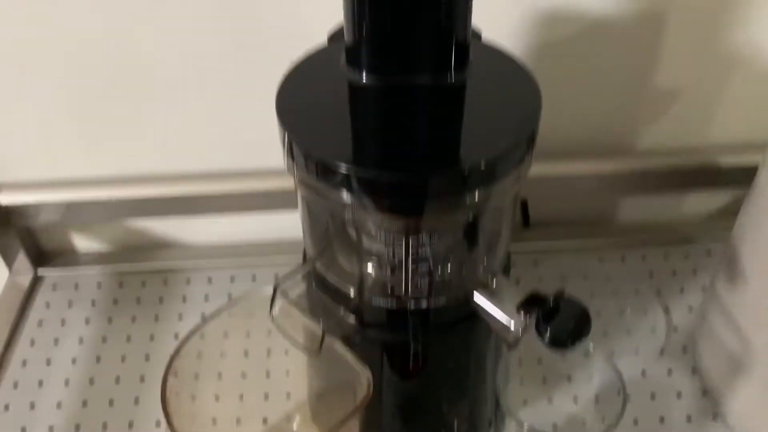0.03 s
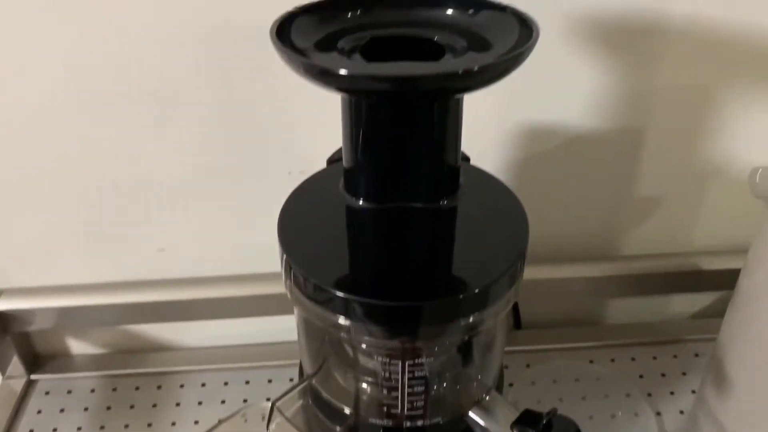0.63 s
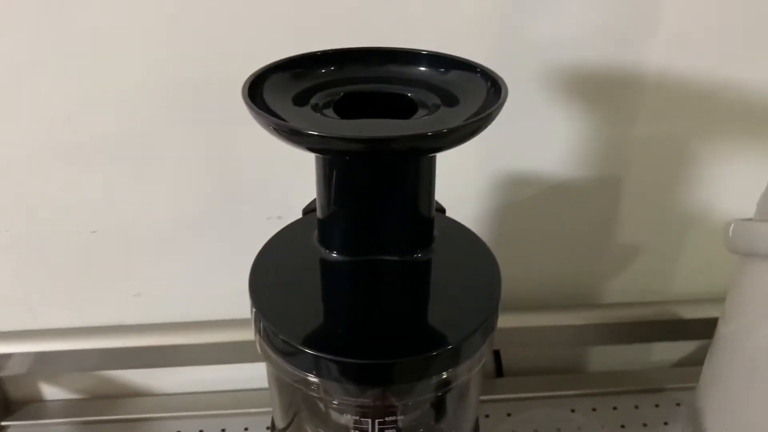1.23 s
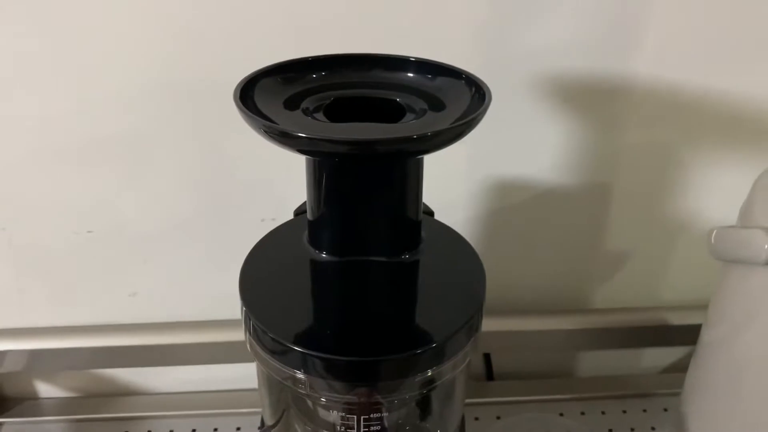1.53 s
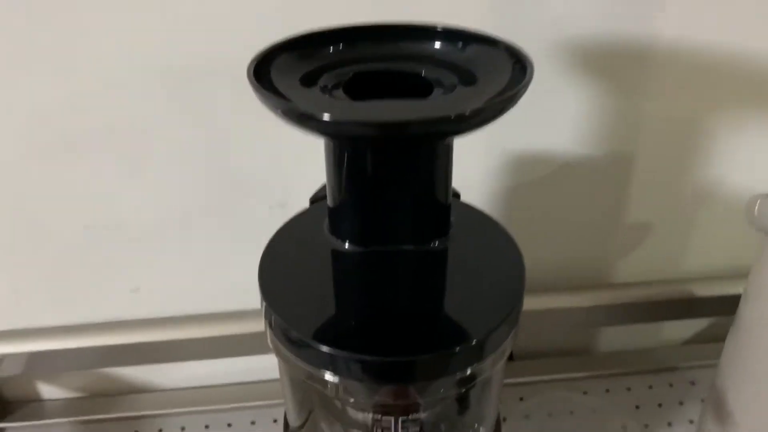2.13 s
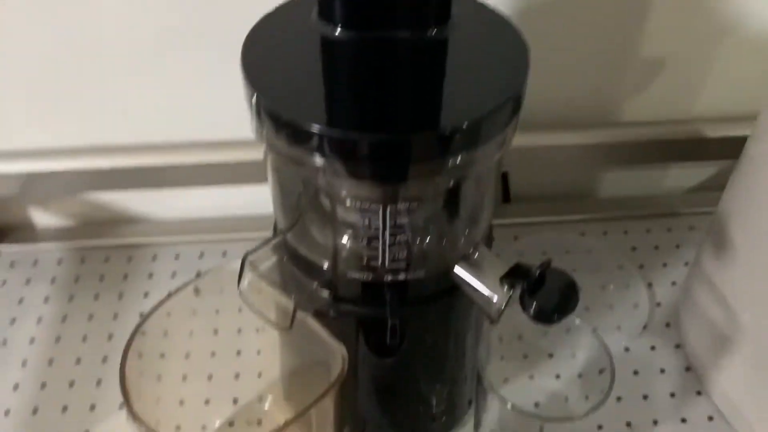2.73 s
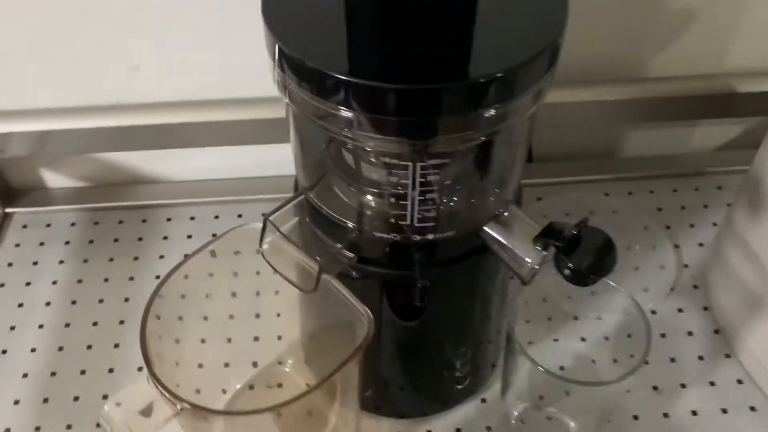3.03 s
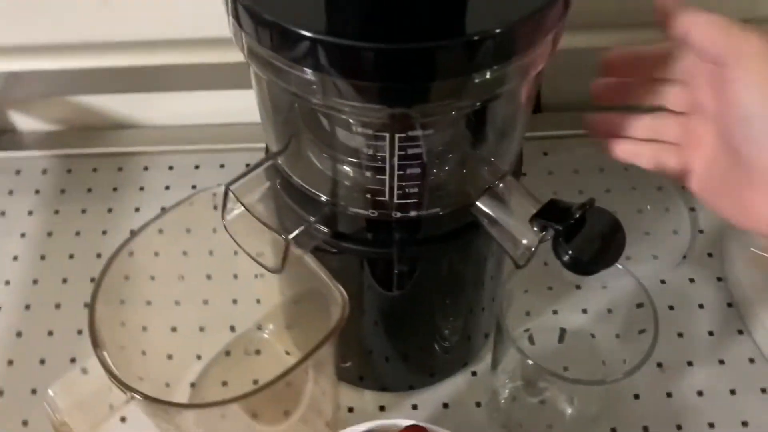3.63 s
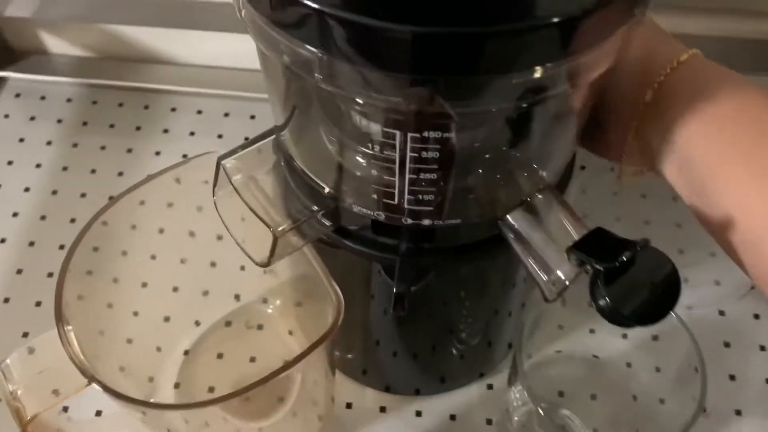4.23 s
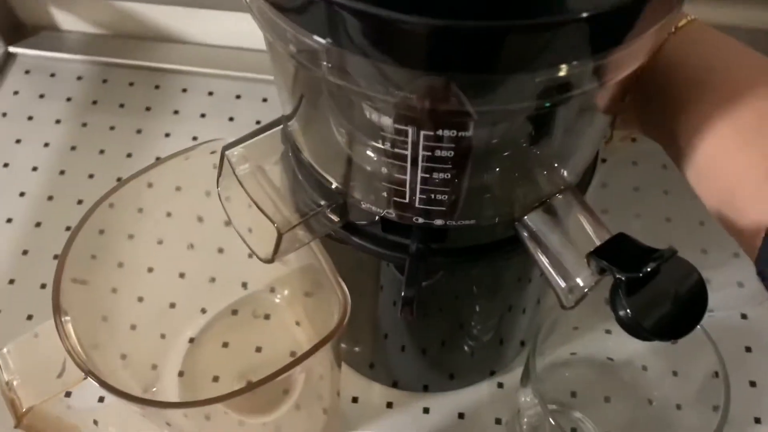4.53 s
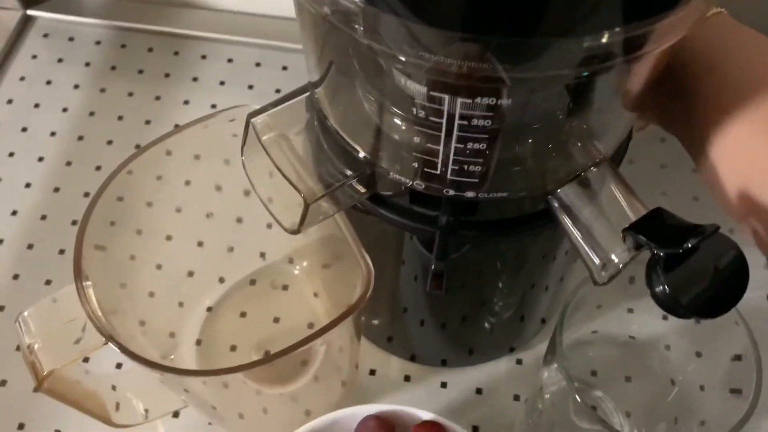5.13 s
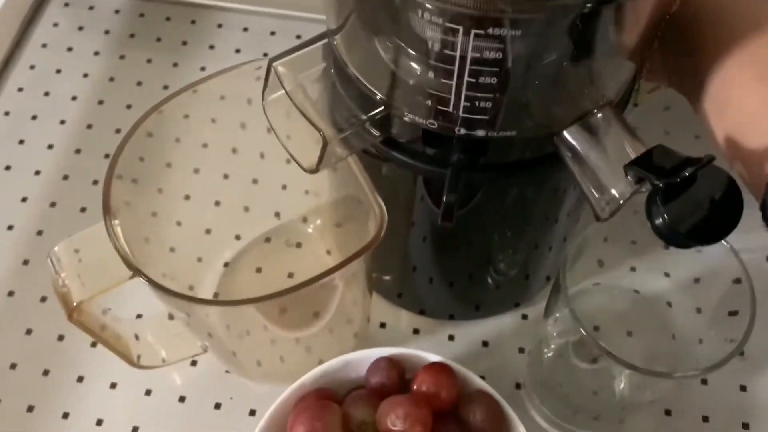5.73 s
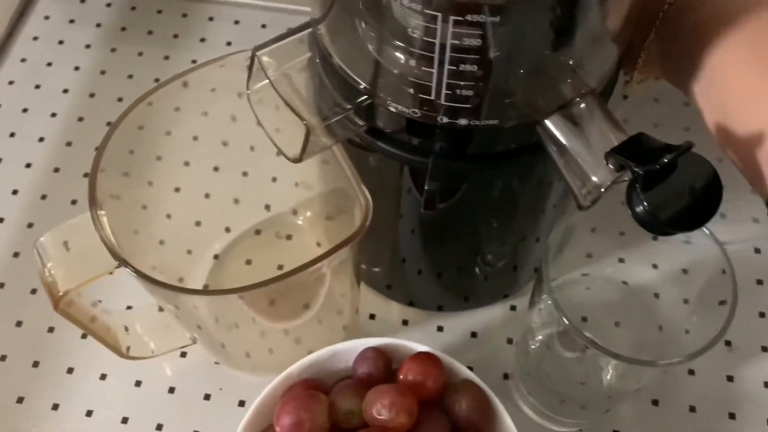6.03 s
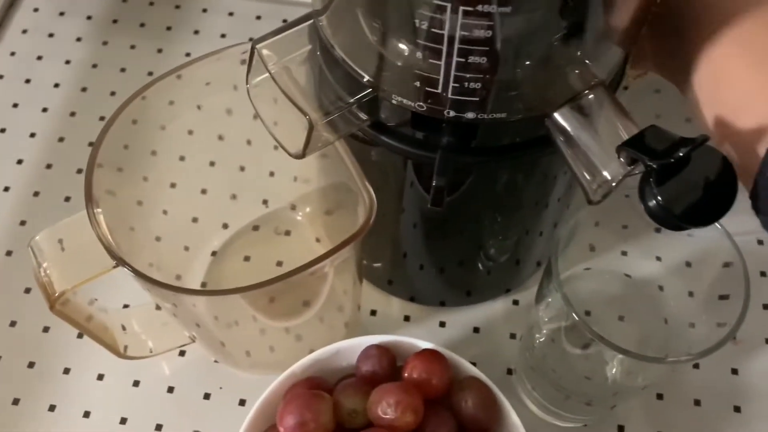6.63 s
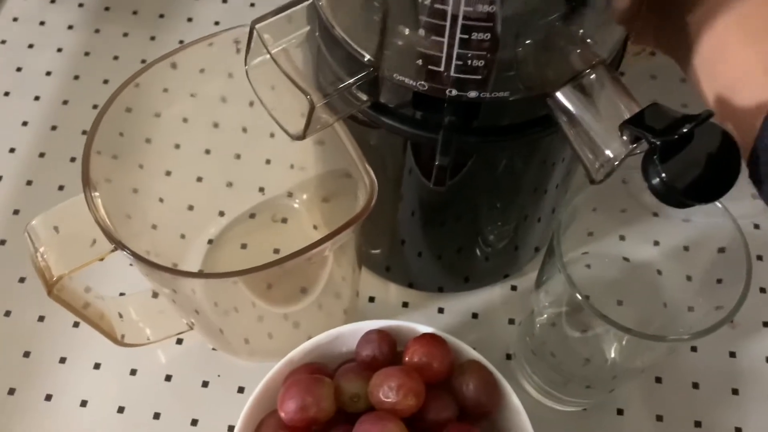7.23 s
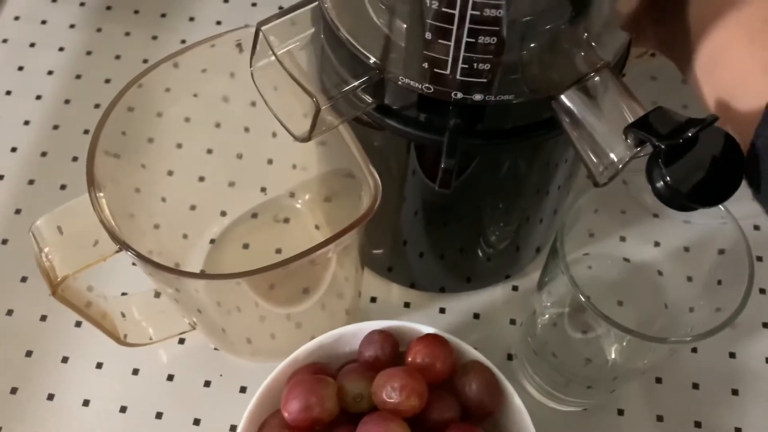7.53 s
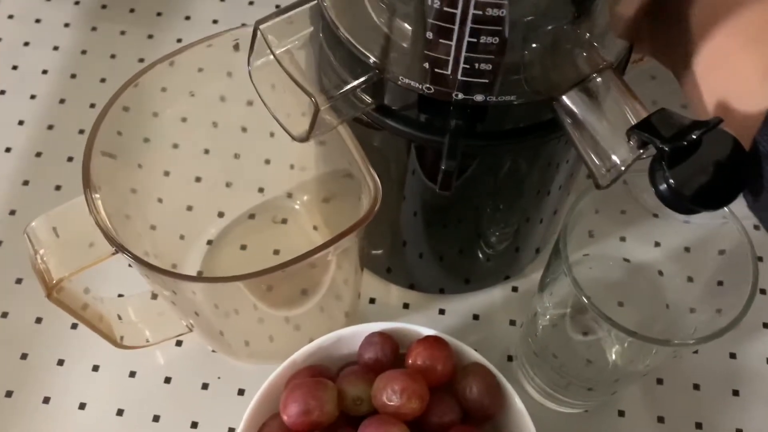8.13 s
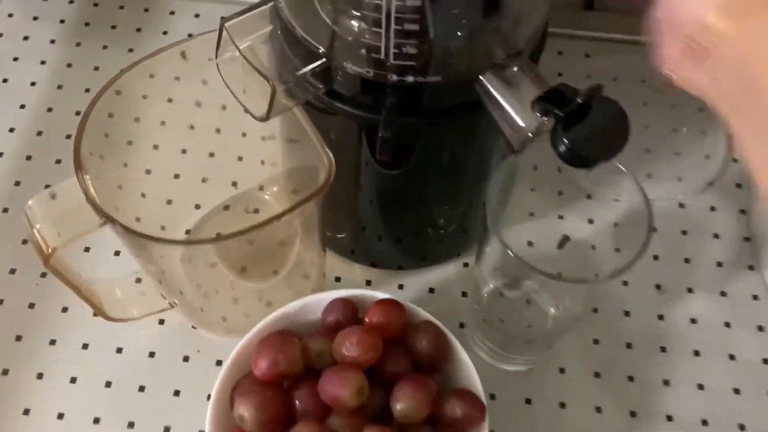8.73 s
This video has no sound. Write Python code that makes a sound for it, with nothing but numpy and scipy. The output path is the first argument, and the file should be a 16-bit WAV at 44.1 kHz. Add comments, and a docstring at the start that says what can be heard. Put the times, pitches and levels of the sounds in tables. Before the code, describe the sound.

Quiet rustles and small scuffs sit over the low, even drone of a kitchen fan. Then a nearby juicer is switched on five times, each sharp click setting off a low motor hum, churning gears and a light rubbing hiss. Hollow plastic knocks, creaks and thuds come from the empty machine as it spins up and slows, ringing briefly in the room. The final two clicks come close together and are the loudest.

```python
"""A kitchen counter, where a slow juicer runs empty against the steady drone of a fan.
After faint rustling and taps, a hand snaps the rocker switch several times: the motor starts, coasts
and starts again. Magnetic force makes it hum, its gears churn and rattle the gearbox, and the loose
auger rubs, squeals and knocks in its bowl. Each impact sets plastic parts ringing in their damped
normal modes, and the room reverberates briefly."""
import sys
import numpy as np
from scipy import signal
from scipy.fft import rfft, irfft, next_fast_len
from scipy.io import wavfile

SR = 44100
rng = np.random.default_rng(int(sys.argv[2]) if len(sys.argv) > 2 else 0)


def transcribe(signal):
    """Save signal, clipped to [-1, 1], as a 16-bit WAV file at the path in sys.argv[1]."""
    frames = np.atleast_2d(signal).T
    limited = np.clip(frames, -1, 1)
    pcm = np.round(limited * 32767).astype(np.int16)
    wavfile.write(sys.argv[1], SR, pcm)


N = 396459
T = np.arange(N) / SR
RING_T = T[:SR // 2]  # time axis of one impact

# Levels are relative; mode frequencies are nominal, scaled by a pitch ratio at each impact.
# powered runs: start_s, held_s, speed_ratio, churn_db, rattle_db, hiss_db (all three at speed 1), hum_db
MOTOR_RUNS = [(4.884, 0.25, 1, -44.5, -46, -60, -52), (5.472, 0.43, 1.254, -43.5, -45, -55, -39),
              (6.211, 0.43, 1.02, -38.5, -39.5, -50, -33.5), (7.938, 0.062, .8, -33, -30.5, -63, -35.5),
              (8.105, 0.8, 0.8, -37, -37, -49, -47)]
SPIN_UP_S, COAST_S, HUM_RISE_S, HUM_FALL_S = 0.075, 0.33, 0.076, 0.23  # time constants
HUM_HZ, MESH_HZ = 120.4, 435.3  # magnetic hum; tooth contacts at speed 1
# spectrum of the churning gears: frequency_hz, density_db
CHURN_SPECTRUM = [(30, -42), (60, -15), (100, -1.5), (150, -9.5), (210, 3), (290, -1.5), (360, -6.5),
                  (450, -8.5), (590, -27.5), (700, -25.5), (1500, -54), (3000, -47)]
# gearbox resonances: centre_hz, nominal_width_hz, level_db
GEARBOX_RESONANCES = [(557.4, 49, 2.5), (945, 76, 4.5), (1024, 69, 4), (1215, 68, -0.5), (1372, 234, -3.5),
                      (1910, 185, -2), (2057, 130, -3), (2740, 550, -15.5), (4080, 640, -23.5)]
# spectrum of the auger rubbing in its bowl: frequency_hz, density_db
HISS_SPECTRUM = [(600, -11), (1500, -9), (2600, 1.5), (3900, 0), (5000, -7.5), (7000, -9.5), (10500, -13),
                 (15000, -7.5)]
# comb filter that colours the hiss: delay_s, gain_ratio
COMB_TAPS = [(0, 0.73), (.0013, -0.072), (.0031, -0.75), (.0074, .35), (0.011, 0.74)]
# the motor's thin whine: pitch_hz, level_db
MOTOR_WHINE_TONES = [(6670, -89), (8226, -71.5)]

# a fingertip's tap on the housing, then snaps of the switch:
# start_s, housing_db, crack_db, auger_db, housing_pitch_ratio
TAP_AND_SNAPS = [(4.185, -38, -42.5, -34.5, 0.95), (4.883, -25.5, -29, -38, 0.87),
                 (5.472, -20, -22.5, -25, 1.02), (6.2109, -11.5, -16.5, -16.5, 1.06),
                 (7.938, -16.5, -17.5, -19, 1.01), (8.105, -6, -19, -6.5, 0.91)]
# spectrum of the crack of a tap or snap: frequency_hz, density_db
CRACK_SPECTRUM = [(100, -1.5), (300, 2.5), (510, 7), (730, -5), (1000, -1), (2000, -1.5), (3600, -4),
                  (5000, -13.5), (10500, -20.5), (15000, -22)]
# modes of the housing: pitch_hz, level_db, t60_s
HOUSING_MODES = [(350, -41, 0.041), (554, -12, 0.13), (920, -5.5, 0.057), (1204, -5.5, 0.035),
                 (1380, 2.5, 0.061), (1420, 1, 0.031), (1736, -1.5, 0.038), (1854, 6, 0.032),
                 (2127, 2, 0.031), (2400, -16.5, 0.15), (2717, -14, 0.089), (2770, -25, 0.016),
                 (3480, -9, 0.078), (4330, -36, 0.036)]
# jolts of the machine on its feet: start_s, level_db, strongest_hz, drop_one_octave_away_db
BODY_JOLTS = [(4.188, -34.5, 424, 39), (4.885, -27, 444, 12), (4.943, -24.5, 286, 13), (4.962, -21, 258, 5),
              (4.97, -27.5, 470, 7), (4.986, -27, 91, 10), (5.472, -24, 464, 8), (5.894, -24.5, 229, 2),
              (6.214, -27, 360, 11), (6.669, -28, 280, 5), (7.589, -43, 300, 4), (7.940, -14.5, 624, 50),
              (8.032, -21.5, 110, 3.5), (8.114, -8, 308, 13), (8.141, -19.5, 290, 12),
              (8.525, -23, 240, 11)]
# modes of the whole body: pitch_hz, level_db, t60_s
BODY_MODES = [(108, 1.5, 0.1), (216, -3, 0.078), (216.3, -4.5, 0.12), (261, -2, 0.098), (352, -3, 0.09),
              (400, -11, 0.06), (450, -1, 0.058), (565, 2, 0.056)]
# knocks of the loose auger: start_s, ring_db, tick_db, pitch_ratio, tilt_db_per_octave
AUGER_KNOCKS = [(4.942, -30, -40, 0.85, 3), (4.9638, -30, -44, 1.11, 8), (5.214, -38, -48, 1, 1),
                (5.239, -34, -35, 1.02, 0), (5.4015, -39, -62, 1, -8), (5.8317, -33, -40, 1.1, 1),
                (5.892, -28, -41, 0.94, 9), (5.959, -30.5, -35.5, 1.02, 4), (5.973, -42, -59, 0.96, 0),
                (6.055, -41, -63, 0.98, 1.5), (6.129, -32, -58, 0.96, -4), (6.158, -36, -51, 0.99, 0),
                (6.180, -35.5, -50, 0.97, 0), (6.32, -29, -38, 1, 0), (6.433, -28.5, -45, .94, 5),
                (6.552, -24, -60, 0.95, -7), (6.669, -27.5, -38, 1.01, -1), (6.821, -26, -52, 0.99, 3),
                (7.028, -38.5, -56, 0.91, 5), (7.037, -32.5, -49.5, 0.98, 0),
                (7.084, -27.5, -36.5, 0.98, 0), (7.5886, -35, -63, 1.01, 4), (7.886, -44, -70, 0.89, 7),
                (8.2627, -29.5, -35, 0.97, -1), (8.355, -42, -60, 0.85, -5), (8.478, -34, -52, 1.08, -3),
                (8.597, -31, -55, 0.97, 2), (8.614, -37, -48, 1.1, 0), (8.967, -28.5, -39, 0.96, 4)]
# modes of the auger: pitch_hz, level_db, t60_s
AUGER_MODES = [(1003, 0.5, 0.053), (1089.4, 5.5, 0.046), (1207, -5.5, 0.064), (1494, -11, 0.047),
               (1737, -7, 0.039), (1910, -5.5, 0.022), (2574, -14, 0.032), (2990, -17, 0.021),
               (3390, -13.5, 0.028)]
# chinks of the lid on its seat: start_s, level_db
LID_CHINKS = [(.826, -55), (.846, -62), (5.1165, -26), (5.889, -26), (6.665, -27), (6.669, -29)]
# modes of the lid: pitch_hz, level_db, t60_s
LID_MODES = [(1580, 0, 0.033), (2120, -3, 0.026), (2580, -4, 0.034), (3480, -6, 0.028), (3740, -3.5, 0.04),
             (4090, 1, 0.047), (4390, -1, 0.037)]
# light ticks of plastic parts: start_s, level_db
PLASTIC_TICKS = [(.825, -56), (.838, -58), (.853, -60), (.872, -60), (1.425, -64), (1.72, -56),
                 (3.4533, -53), (4.8182, -45.5), (4.836, -50), (4.9894, -45), (5.0816, -45), (5.1166, -38),
                 (5.4177, -42.5), (5.5976, -43), (5.73, -35), (5.888, -36), (6.176, -35), (6.403, -39),
                 (6.414, -40), (6.572, -34.5), (6.666, -38), (7.563, -65), (7.906, -55), (8.032, -43.5),
                 (8.114, -24), (8.6153, -32)]
# spectrum of a tick: frequency_hz, density_db
TICK_SPECTRUM = [(400, 11.5), (1500, 4), (4000, 4), (5500, 2.5), (10500, -3), (15000, 0.5)]
# creaks of plastic slipping on plastic: start_s, level_db, pitch_ratio
PLASTIC_SLIPS = [(5.24, -48, 0.79), (5.833, -34, 0.82), (6.133, -33, 0.99), (6.157, -34, 1),
                 (6.177, -33, .93), (7.086, -29.5, 0.96), (8.264, -26, 0.97)]
# modes rung by a slip: pitch_hz, level_db, t60_s
SLIP_MODES = [(2460, -8, 0.02), (2675, 0.5, 0.02), (2880, -16, 0.01)]
# squeals of the auger taking up speed: start_s, length_s, start_hz, end_hz, level_db, jitter_ratio
AUGER_SQUEALS = [(4.973, 0.052, 943, 890, -47, .015), (5.032, 0.06, 925, 905, -42.5, 0.013),
                 (5.014, 0.049, 1883, 2235, -44.5, 0.065), (5.066, 0.063, 1026, 1200, -44.5, .04),
                 (5.476, 0.13, 935, 887, -46, 0.02), (5.485, 0.03, 2084, 2050, -43, 0.05),
                 (8.087, 0.018, 1900, 2200, -37, .03)]
# spectrum of the dry auger's small catches: frequency_hz, density_db
CATCH_SPECTRUM = [(300, -1), (750, -8), (1000, 10), (1500, 0), (2050, 0.5), (2600, -5), (3900, -14),
                  (5200, -29), (10000, -20), (15000, -20)]

# strokes of rustling: peak_s, swell_s, peak_db, tilt_db_per_octave
RUSTLE_STROKES = [(.79, 0.068, -63.5, 2.5), (.83, 0.015, -51.5, .8), (1.1, 0.11, -58, 1.9),
                  (1.24, 0.17, -58, 1.2), (1.46, 0.043, -64.5, -4), (1.727, 0.0096, -61.5, 0),
                  (2.1, 0.051, -61.5, -3), (2.71, 0.023, -65.5, -2), (2.9, 0.029, -64, -2),
                  (3.21, 0.079, -63.5, -0.5), (3.46, 0.11, -69, -2), (3.939, 0.081, -65, 1.5),
                  (4.18, 0.067, -62.5, 0), (4.39, .09, -68.5, -3), (4.836, 0.018, -54.5, 2)]
# spectrum of a stroke: frequency_hz, density_db
STROKE_SPECTRUM = [(500, -32), (900, -1.5), (1630, 4.5), (2760, 0.5), (6000, -2), (7400, -3.5),
                   (8700, -0.5), (10500, -2.5), (15000, -7)]
# soft rubbing under the strokes: time_s, level_db
RUBBING_LEVEL = [(0.3, -88), (0.55, -75), (0.8, -72), (1.4, -74.5), (2.4, -80), (2.8, -75), (3.2, -67),
                 (3.7, -74.5), (4.2, -76), (4.6, -80), (5, -84)]
# spectrum of that rubbing: frequency_hz, density_db
RUBBING_SPECTRUM = [(500, -25), (1200, 3.5), (4000, 2.5), (7500, -4.5), (8400, 1.5), (9700, -4.5),
                    (11000, -5.5), (15000, -16.5)]
# faint scuffs and taps: start_s, level_db, centre_hz, half_width_octaves, t60_s
FAINT_SCUFFS = [(.822, -63, 2100, 0.3, 0.76), (1.717, -49, 3600, .35, .035), (1.72, -56, 4130, 1.1, 0.47),
                (1.719, -46, 13200, 0.44, 0.26), (2.086, -56, 2500, 1.5, 0.4),
                (2.437, -63, 1600, 0.77, 0.13), (2.70, -64.5, 2500, 0.94, 0.59),
                (2.92, -54, 600, 1.15, 0.41), (3.189, -57, 1270, 0.73, 0.3),
                (3.452, -42.5, 1780, 0.4, 0.094), (3.467, -52.5, 1790, 0.61, 0.46),
                (4.686, -56.5, 1800, 1.24, 0.39)]

# tones of the fan: pitch_hz, level_db
FAN_PARTIALS = [(58, -65.5), (69.5, -69), (81, -63.5), (92.6, -66), (96.6, -63), (104.3, -61.5),
                (108.4, -52), (110.6, -60), (117.5, -68.5), (120, -50.5), (127.2, -60), (131.6, -57.5),
                (143.2, -64.5), (150.2, -67.5), (162, -72), (177.6, -76), (240, -70.5), (360, -69.5),
                (985, -77)]
# spectrum of the fan's air noise: frequency_hz, density_db
AIR_SPECTRUM = [(20, -16), (35, -10.5), (55, -5), (80, -2.5), (110, 1), (150, -6.5), (200, -12.5),
                (400, -11.5), (520, -12.5), (630, -23.5), (780, -22.5), (1000, -23), (1700, -31.5),
                (3600, -37), (6000, -50.5), (15000, -53)]
# swell of the low drone: time_s, gain_db
DRONE_SWELL = [(0, -0.6), (1.4, -1), (2.8, 0.5), (5.3, 0.5), (5.7, 3.5), (7.3, 6), (8.9, 2)]
WHINE_LOW_HZ, WHINE_MID_HZ, WHINE_HIGH_HZ = 3036, 3278, 3752
# swells of the fan's three thin whines: peak_s, swell_s, pitch_hz, level_db
FAN_WHINES = [(.4, .6, WHINE_MID_HZ, -87), (.9, .8, WHINE_HIGH_HZ, -88), (1.55, .4, WHINE_LOW_HZ, -83.5),
              (2.5, 0.58, WHINE_HIGH_HZ, -88.5), (2.9, .8, WHINE_MID_HZ, -88.5),
              (3.65, 0.56, WHINE_LOW_HZ, -81), (4.4, .5, WHINE_HIGH_HZ, -82)]
# reverberation time of the kitchen: frequency_hz, t60_s
ROOM_DECAY = [(100, 0.46), (500, 0.61), (2000, 0.62), (6000, 0.59), (15000, 0.45)]
# left-right coherence of the nearby machine: frequency_hz, coherence_ratio
MACHINE_COHERENCE = [(60, 1), (130, 0.93), (290, 1), (640, 0.51), (1000, 0.32), (1410, 0.8), (3100, 0),
                     (6820, 0.14), (15000, 0.16)]
# left-right coherence of the room's sounds: frequency_hz, coherence_ratio (negative counts as 0)
ROOM_COHERENCE = [(40, 1), (130, 0.65), (290, 0.5), (510, 0), (1500, -0.5), (2000, -0.8), (3100, 0),
                  (7000, 0.01), (15000, 0.06)]
# overall tone colour: frequency_hz, gain_db
OVERALL_RESPONSE = [(18, -14), (50, -0.5), (10500, -1), (11900, -18), (12900, 0.5), (14000, -2),
                    (15200, -26)]
# stereo balance: frequency_hz, left_minus_right_db
STEREO_BALANCE = [(60, 0.5), (150, -1.0), (380, -2.1), (950, 1), (2380, 1.7), (5980, -1), (15000, -1.5)]


def motor():
    """Superposition: hum, churn, tooth rattle and friction hiss, all modulated by one varying load."""
    churn_gain, rattle_gain, hiss_gain = gear_gains()
    load = wander(45)  # the auger binds and frees
    hum = magnetic_hum() * gain_of(2.5 * load)
    force = tooth_force()
    churn = churn_gain * gain_of(4 + 1.74 * load) * noise(CHURN_SPECTRUM, N, MACHINE_COHERENCE)
    rattle = rattle_gain * gain_of(0.63 * load) * gearbox(force)
    hiss_flicker = gain_of(0.35 * load + 1.1 * wander(300))
    hiss = hiss_gain * hiss_flicker * comb(noise(HISS_SPECTRUM, N, MACHINE_COHERENCE))
    return hum + churn + rattle + hiss


def shaft_speeds():
    """Inertia: in each run the shaft spins up quickly, then coasts down slowly."""
    return np.array([top * rise_and_fall(s, held, SPIN_UP_S, COAST_S) for s, held, top, *_ in MOTOR_RUNS])


def gear_gains():
    """Power laws tie churn, rattle and hiss to shaft speed; the loudest run sets each gain."""
    *_, churn_db, rattle_db, hiss_db, _ = np.transpose(MOTOR_RUNS)[..., None]
    doublings = np.log2(shaft_speeds() + 1e-9)
    laws = [(churn_db, 7), (rattle_db, 13), (hiss_db, 11)]
    return [gain_of(db + db_per_doubling * doublings).max(axis=0) for db, db_per_doubling in laws]


def magnetic_hum():
    """Alternating magnetic force gives a fundamental and a weaker octave, swelling with each run."""
    level = sum(gain_of(db) * rise_and_fall(s, held, HUM_RISE_S, HUM_FALL_S)
                for s, held, *_, db in MOTOR_RUNS)
    cycles = HUM_HZ * T + 0.063 * wander(25)
    return level * (tone(cycles) + gain_of(-13) * tone(2 * cycles))


def tooth_force(impact_share=0.029):
    """Gear meshing: uneven impulses at the tooth rate, plus the friction noise of sliding flanks."""
    mesh_hz = MESH_HZ * shaft_speeds().max(axis=0) * (1 + 0.01 * wander(25))
    contacts = np.diff(np.floor(np.cumsum(mesh_hz) / SR), prepend=0)
    unevenness, sliding = rng.standard_normal((2, 2, N))
    impacts = unit_rms(contacts * (0.77 + unevenness))
    force = np.sqrt(impact_share) * impacts + np.sqrt(1 - impact_share) * sliding
    return stereo_pair(*force, MACHINE_COHERENCE)


def gearbox(force):
    """Forced resonance: as the contact point moves, each peak drifts in pitch and level."""
    out = 0
    for hz, width_hz, db in GEARBOX_RESONANCES:
        centre_hz = hz * (1 + 0.016 * wander(12))
        band = resonate(force, centre_hz, 1.29 * width_hz)
        out += gain_of(db + wander(45)) * resonate(band, centre_hz, 1.28 * width_hz)
    return unit_rms(out)


def comb(x):
    """Comb filtering gives the hiss a hollow, resonant colour."""
    out = np.zeros_like(x)
    for delay_s, gain in COMB_TAPS:
        add(out, delay_s, gain * x)
    return unit_rms(out)


def motor_whine(fade_db_per_s=3):
    """Phase modulation roughens two thin tones that fade through the last, long run."""
    s, held, *_ = MOTOR_RUNS[-1]
    fade = gain_of(-fade_db_per_s * np.maximum(T - s, 0))
    tones = sum(gain_of(db) * tone(hz * T + 0.16 * wander(40)) for hz, db in MOTOR_WHINE_TONES)
    return rise_and_fall(s, held, HUM_RISE_S, HUM_FALL_S) * fade * tones


def tap_and_snaps(lead_s=0.013, bounce_s=0.0068):
    """Impact excitation: a fingertip taps the housing, then the switch snaps; housing and auger ring."""
    out = np.zeros((2, N))
    for s, housing_db, crack_db, auger_db, pitch in TAP_AND_SNAPS:
        add(out, s - lead_s, gain_of(crack_db - 8) * strike(0.0083, 0.11) * burst(CRACK_SPECTRUM))
        add(out, s - 0.002, gain_of(crack_db) * strike(0.0015, 0.069) * burst(CRACK_SPECTRUM))
        add(out, s, gain_of(housing_db) * ring(HOUSING_MODES, pitch, rise_s=0.0011, spread=0.22))
        bounce = ring(HOUSING_MODES, pitch, rise_s=0.0014, spread=0.19)
        add(out, s + bounce_s, gain_of(housing_db - 9) * bounce)
        add(out, s, gain_of(auger_db) * ring(AUGER_MODES, pitch=0.93, rise_s=0.0018, spread=0.11))
    return out


def jolts():
    """Impulse response of the jolted body: slow pushes excite low modes, quick ones higher."""
    out = np.zeros((2, N))
    for s, db, push_hz, drop_db in BODY_JOLTS:
        modes = [(hz, level - drop_db * np.log2(hz / push_hz) ** 2, t60) for hz, level, t60 in BODY_MODES]
        add(out, s, gain_of(db) * ring(modes, pitch=0.96, rise_s=0.0022, spread=0.17))
    return out


def auger_knocks(scatter_db=2):
    """Modal weights depend on the point of impact, so each hollow knock has its own timbre."""
    out = np.zeros((2, N))
    for s, db, _, pitch, tilt in AUGER_KNOCKS:
        modes = [(hz, level + tilt * np.log2(hz) + scatter_db * rng.standard_normal(), t60)
                 for hz, level, t60 in AUGER_MODES]
        add(out, s, gain_of(db + 6) * ring(modes, pitch, rise_s=0.0034, spread=0.093))
    return out


def lid_chinks():
    """Free vibration of the lid striking its seat, at a slightly different pitch each time."""
    out = np.zeros((2, N))
    for s, db in LID_CHINKS:
        pitch = 0.92 * (1 + 0.051 * rng.standard_normal())
        add(out, s, gain_of(db) * ring(LID_MODES, pitch, rise_s=0.00062, spread=0.2))
    return out


def ticks():
    """Brief contact has a broad spectrum: plastic parts and auger tick, with one bright resonance."""
    out = np.zeros((2, N))
    for s, db in PLASTIC_TICKS + [(s, db) for s, _, db, *_ in AUGER_KNOCKS]:
        contact = burst(TICK_SPECTRUM)
        bright = gain_of(-7) * unit_rms(resonate(contact, hz=2000, width_hz=260))
        add(out, s - 0.001, gain_of(db + 2) * strike(0.0014, 0.043) * (contact + bright))
    return out


def creaks():
    """Stick-slip: each release of plastic on plastic is a hard, heavily damped ring."""
    out = np.zeros((2, N))
    for s, db, pitch in PLASTIC_SLIPS:
        add(out, s, gain_of(db) * ring(SLIP_MODES, pitch, rise_s=0.0013, spread=0.22))
    return out


def auger_squeals():
    """Friction-driven oscillation: dragging plastic sings in short, rough glides."""
    out, waver, judder = np.zeros((2, N)), wander(400), gain_of(2 * wander(150))
    for s, length_s, start_hz, end_hz, db, jitter in AUGER_SQUEALS:
        n, start = int(length_s * SR), int(s * SR)
        hz = np.linspace(start_hz, end_hz, n) * (1 + jitter * waver[start:][:n])
        level = gain_of(db) * judder[start:][:n] * signal.windows.tukey(n, 0.6)
        add(out, s, level * tone(np.cumsum(hz) / SR))
    return out


def auger_catches(per_s=60, spots=8):
    """Shot noise: the dry auger catches at random on a few spots, as loudly as its speed dictates."""
    out = np.zeros((2, N))
    for _ in range(spots):
        sizes = gain_of(7 * np.minimum(rng.exponential(1, N), 3))
        impulses = sizes * (rng.random(N) < per_s / spots / SR)
        response = burst(CATCH_SPECTRUM) * strike(0.0002, 0.035)
        out += signal.oaconvolve(impulses[None], response, axes=1)[:, :N]
    _, rattle_gain, _ = gear_gains()
    return gain_of(-15) * rattle_gain * unit_rms(out)


def rustle(fade_db_per_s=99, grain_db=1.2):
    """Friction noise: light strokes swell and die over soft rubbing, with a fine uneven grain."""
    out = noise(RUBBING_SPECTRUM, N) * gain_of(np.interp(T, *np.transpose(RUBBING_LEVEL)))
    from_peak_s = T[:SR] - 0.5
    for s, swell_s, db, tilt in RUSTLE_STROKES:
        spectrum = [(hz, level + tilt * np.log2(hz)) for hz, level in STROKE_SPECTRUM]
        swell = np.exp(-(np.minimum(from_peak_s, 0) / swell_s) ** 2)
        fade = gain_of(db - fade_db_per_s * np.maximum(from_peak_s, 0))
        add(out, s + from_peak_s[0], swell * fade * noise(spectrum, SR))
    return out * gain_of(grain_db * wander(100))


def scuffs():
    """Transient contact: each faint scuff or tap is a band of noise in exponential decay."""
    out, hz = np.zeros((2, N)), np.geomspace(100, 16000, num=64)
    for s, db, centre_hz, octaves, t60 in FAINT_SCUFFS:
        band_db = -4.5 * np.log2(1 + (np.log2(hz / centre_hz) / octaves) ** 4)
        add(out, s, gain_of(db) * strike(0.0013, t60) * noise(np.c_[hz, band_db], len(RING_T)))
    return out


def fan(drone_below_hz=260, air_db=-51.5):
    """Beating: close, wavering tones interfere over air noise; the low drone and the air swell."""
    tones, swell_db = 0, np.interp(T, *np.transpose(DRONE_SWELL))
    for hz, db in FAN_PARTIALS:
        level = gain_of(db + swell_db * (hz < drone_below_hz) + wander(2.99))
        tones += level * tone(hz * T + rng.random() + 0.02 * wander(4.3))
    return tones + gain_of(air_db + 0.65 * swell_db) * noise(AIR_SPECTRUM, N)


def fan_whines(flutter_db=4):
    """Amplitude modulation: faint tones of steady pitch flutter as they come and go."""
    out = 0
    for s, swell_s, hz, db in FAN_WHINES:
        swell = np.exp(-((T - s) / swell_s) ** 2 / 2)
        out += gain_of(db + flutter_db * wander(8.2)) * swell * tone(hz * T)
    return out


def kitchen(x, echoes_per_s=3000):
    """Reverberation: sparse reflections of random sign, each band decaying at its own rate."""
    shape = (2, len(RING_T))
    echoes = rng.choice([-1., 1.], shape) * (rng.random(shape) < echoes_per_s / SR) * (RING_T > 0.004)
    hz, t, bands = signal.stft(echoes, SR, nperseg=256)
    decay = np.exp(-np.log(1000) * t / curve_at(ROOM_DECAY, hz)[:, None])
    _, tail = signal.istft(bands * decay, SR, nperseg=256)
    return signal.fftconvolve(x, tail / np.linalg.norm(tail[0]), axes=1)[:, :N]


def ring(modes, pitch, rise_s, spread):
    """Damped normal modes; spread scatters their phase between left and right."""
    out = 0
    for hz, db, t60 in modes:
        phase = rng.random() + spread * hz / (hz + 2000) * rng.standard_normal((2, 1))
        out += gain_of(db) * strike(rise_s, t60) * np.sin(2 * np.pi * (hz * pitch * RING_T + phase))
    return out / np.sqrt(sum(gain_of(db) ** 2 for _, db, _ in modes))


def strike(rise_s, t60_s):
    """Impact envelope: a quick rise, then exponential decay."""
    return (1 - np.exp(-(RING_T / rise_s) ** 2)) * np.exp(-np.log(1000) * RING_T / t60_s)


def rise_and_fall(start_s, held_s, rise_s, fall_s):
    """First-order response: climbs toward 1 while the switch is held, then decays."""
    rise = 1 - np.exp(-np.clip(T - start_s, 0, held_s) / rise_s)
    return rise * np.exp(-np.maximum(T - start_s - held_s, 0) / fall_s)


def resonate(x, hz, width_hz):
    """Band-pass resonator of gain 1 whose centre may move."""
    carrier = np.exp(2j * np.pi * np.cumsum(hz * np.ones(x.shape[-1])) / SR)
    pole = np.exp(-np.pi * width_hz / SR)
    return 2 * (carrier * signal.lfilter([1 - pole], [1, -pole], x / carrier + 1e-18)).real


def noise(spectrum, size, coherence=ROOM_COHERENCE):
    """Spectrally shaped stereo noise of rms 1."""
    n = next_fast_len(size)
    white = stereo_pair(*rng.standard_normal((2, n)), coherence)
    gain = gain_of(curve_at(spectrum, np.fft.rfftfreq(n, 1 / SR)))
    return unit_rms(irfft(rfft(white) * gain, n)[:, :size])


def burst(spectrum):
    """Shaped noise for one impact on the machine."""
    return noise(spectrum, len(RING_T), MACHINE_COHERENCE)


def stereo_pair(common, other, coherence):
    """Partial coherence: two signals mix as mid and side into left and right."""
    alike = np.clip(curve_at(coherence, np.fft.rfftfreq(len(common), 1 / SR)), 0, 1)
    mid = rfft(common) * np.sqrt((1 + alike) / 2)
    side = rfft(other) * np.sqrt((1 - alike) / 2)
    return irfft(np.array([mid + side, mid - side]), len(common))


def wander(per_s):
    """Random modulation of rms 1."""
    knots = rng.standard_normal(8192)
    return unit_rms(np.interp(T * per_s, np.arange(len(knots)), knots))


def tone(cycles):
    """Sinusoid of rms 1."""
    return np.sqrt(2) * np.sin(2 * np.pi * cycles)


def curve_at(points, hz):
    """Interpolation on a log-frequency axis."""
    knots_hz, values = np.transpose(points)
    return np.interp(np.log(hz + 1), np.log(knots_hz + 1), values)


def add(mix, start_s, sound):
    """Superposition of a sound on the mix."""
    part = mix[..., max(round(start_s * SR), 0):][..., :sound.shape[-1]]
    part += sound[..., :part.shape[-1]]


def gain_of(db):
    """Decibels to amplitude ratio."""
    return 10 ** (np.asarray(db) / 20)


def unit_rms(x):
    """Normalisation to rms 1."""
    return x / np.sqrt(np.mean(x ** 2) + 1e-20)


def scene():
    """Superposition of all sources; only the machine's contact sounds reverberate."""
    contacts = tap_and_snaps() + jolts() + auger_knocks() + lid_chinks() + ticks()
    contacts += creaks() + auger_squeals() + auger_catches()
    background = fan() + fan_whines() + rustle() + scuffs()
    return motor() + motor_whine() + contacts + gain_of(-10) * kitchen(contacts) + background


def record(dry, cutoff_hz=15800):
    """Linear filtering: overall tone colour, left-right balance and a band limit."""
    hz = np.fft.rfftfreq(N, 1 / SR)
    balance_db = curve_at(STEREO_BALANCE, hz)
    response_db = curve_at(OVERALL_RESPONSE, hz) + np.array([balance_db, -balance_db]) / 2
    coloured = irfft(rfft(dry) * gain_of(response_db), N)
    low_pass = signal.firwin(511, cutoff_hz, window=("kaiser", 9), fs=SR)
    return signal.oaconvolve(coloured, low_pass[None], "same")


dry = scene()
out = record(dry)
transcribe(out)
```